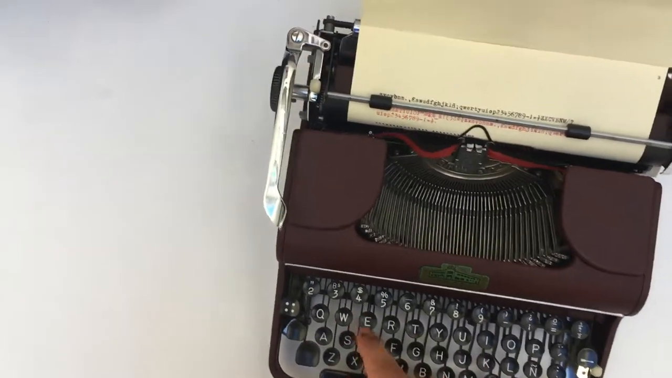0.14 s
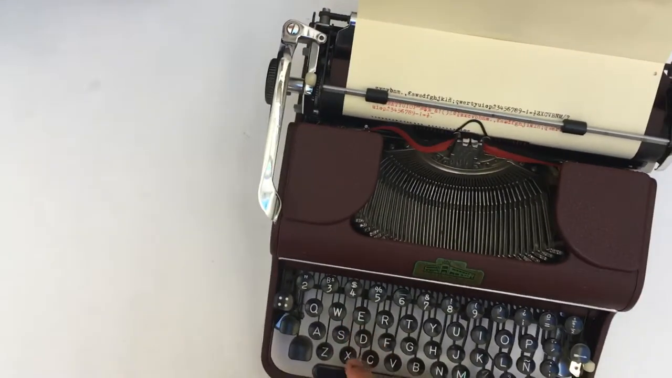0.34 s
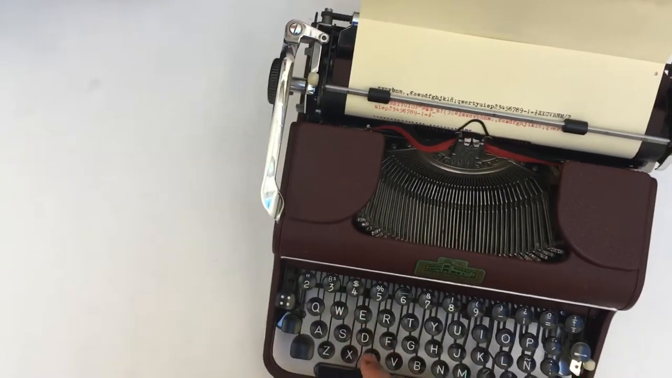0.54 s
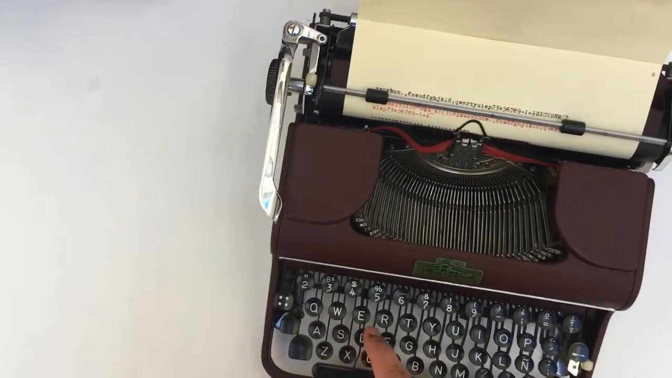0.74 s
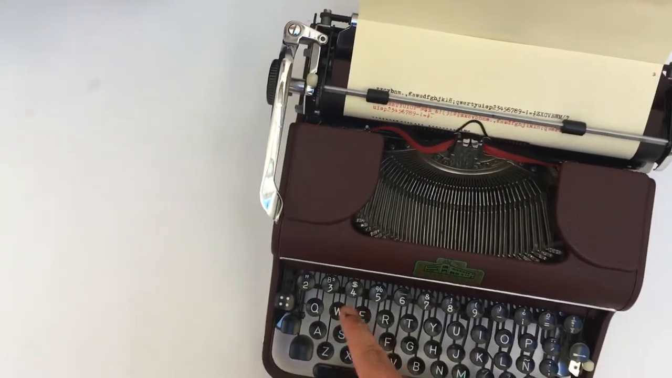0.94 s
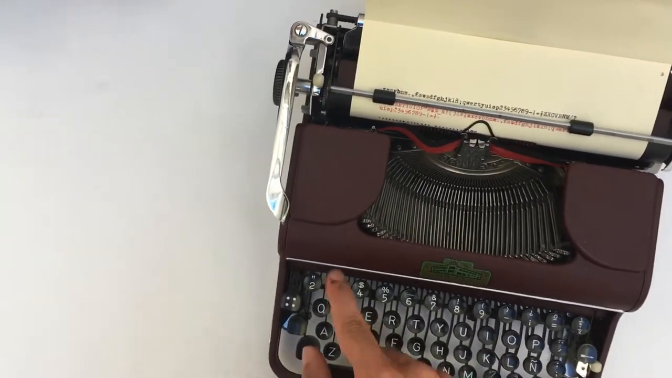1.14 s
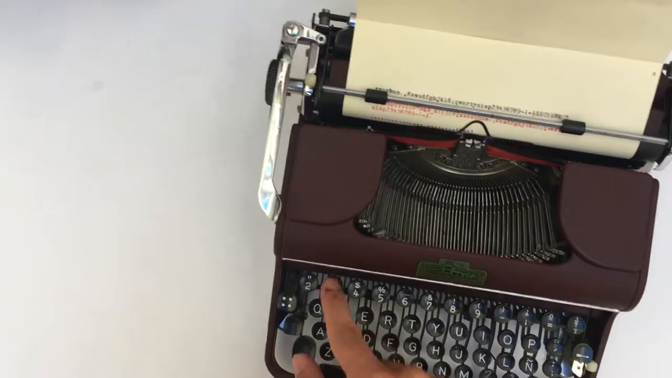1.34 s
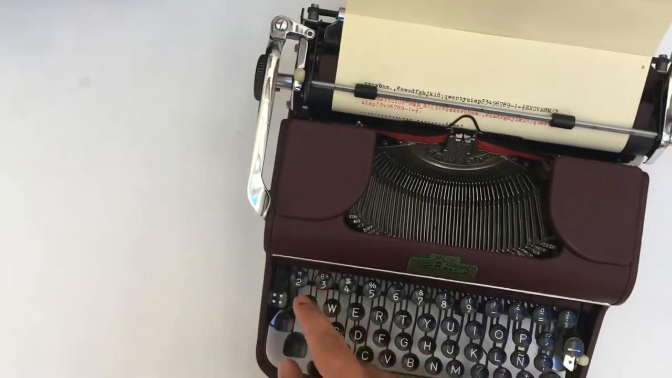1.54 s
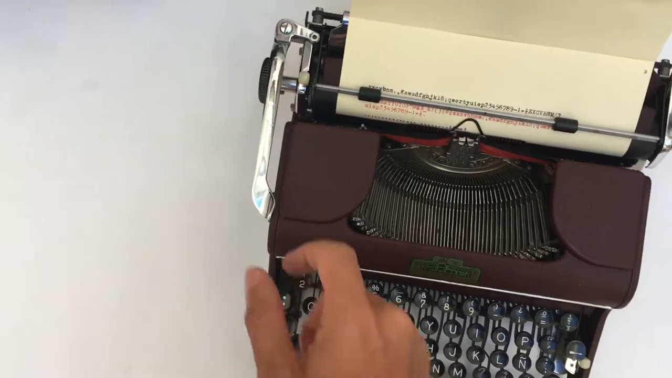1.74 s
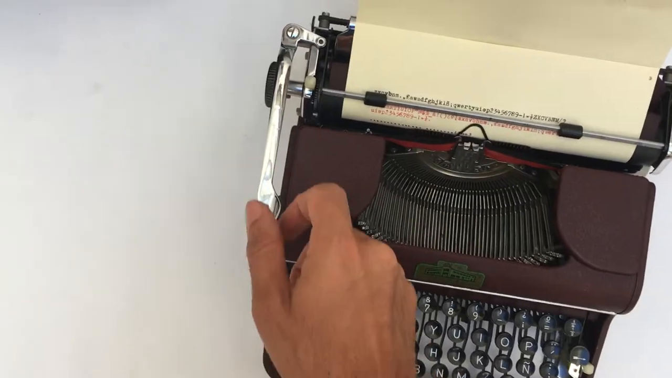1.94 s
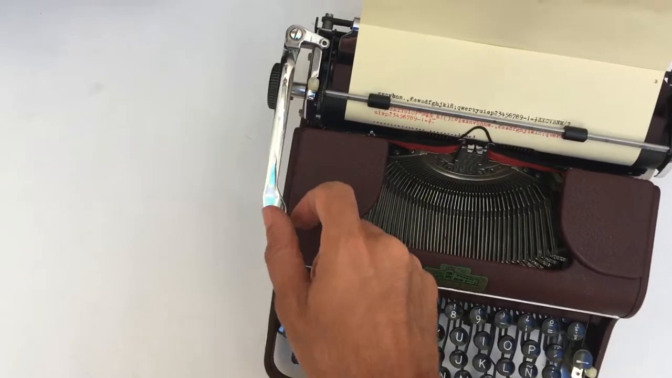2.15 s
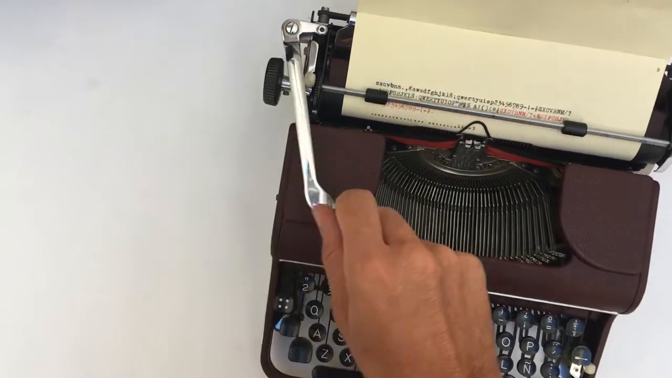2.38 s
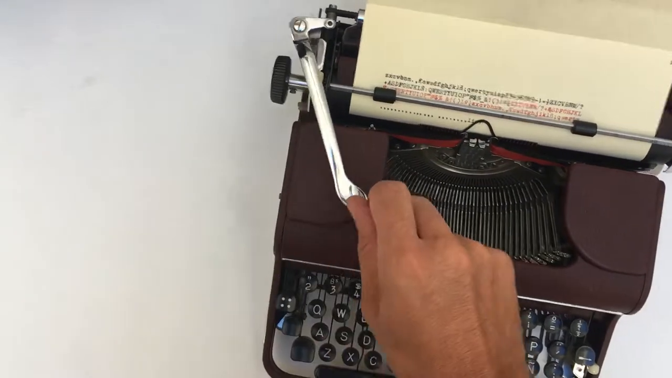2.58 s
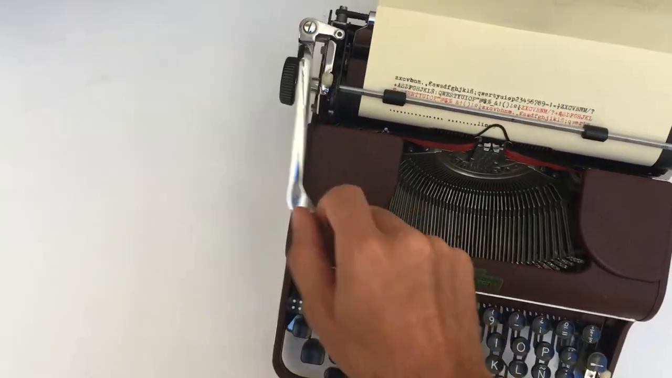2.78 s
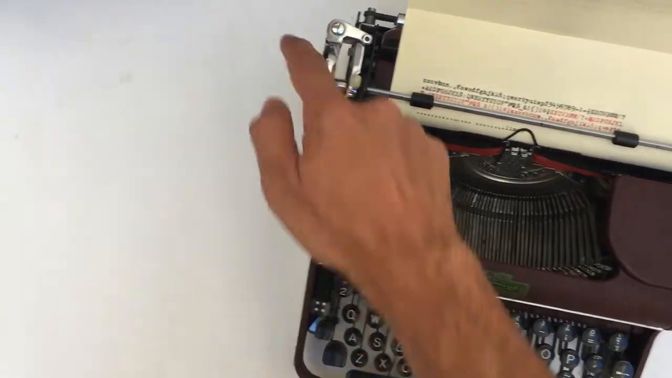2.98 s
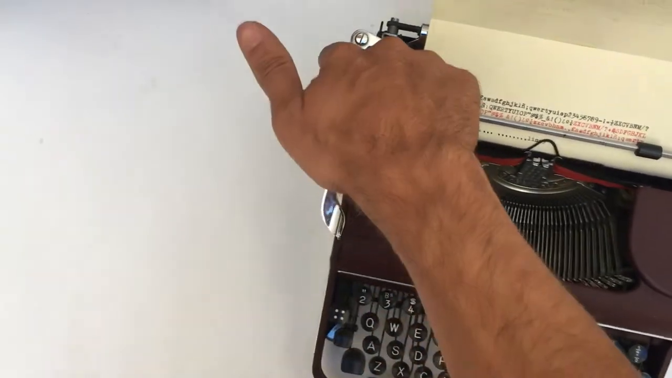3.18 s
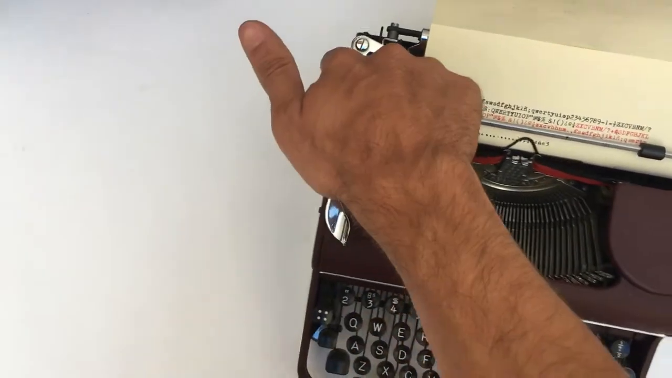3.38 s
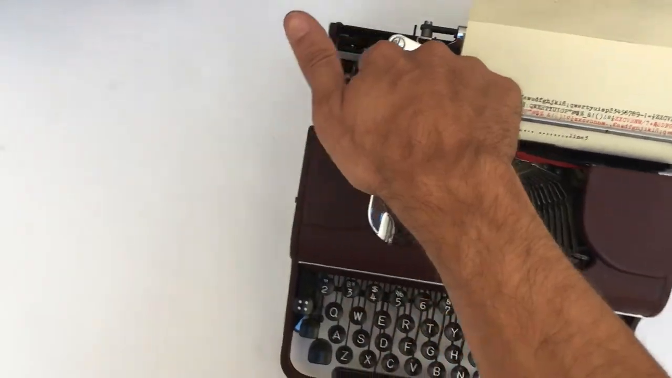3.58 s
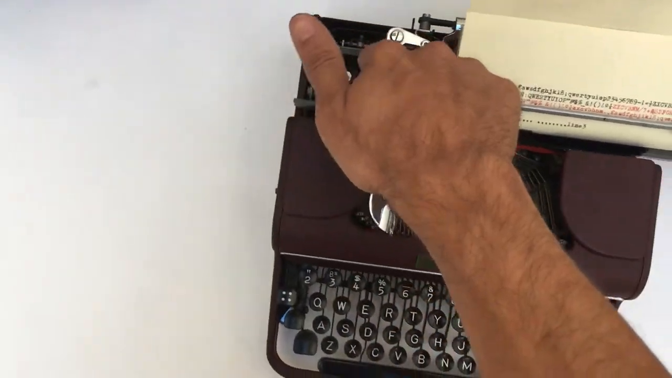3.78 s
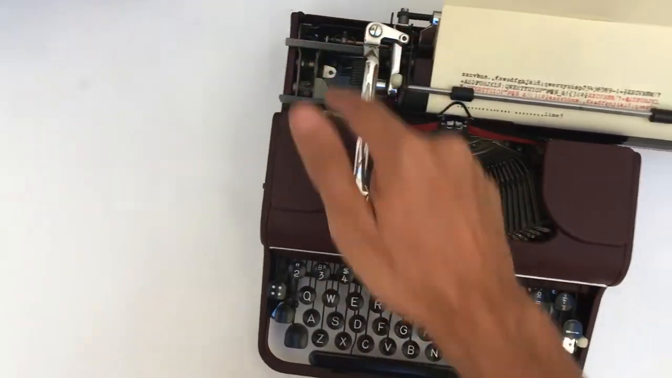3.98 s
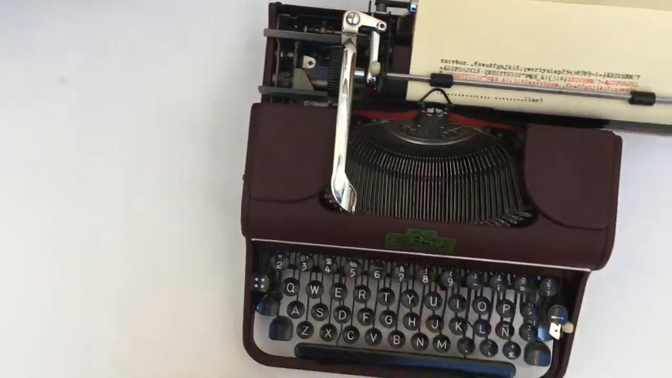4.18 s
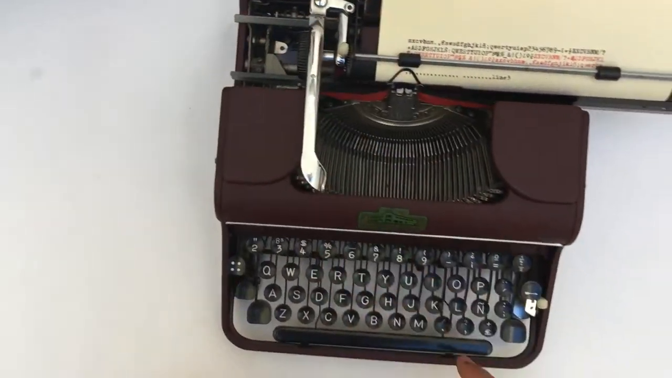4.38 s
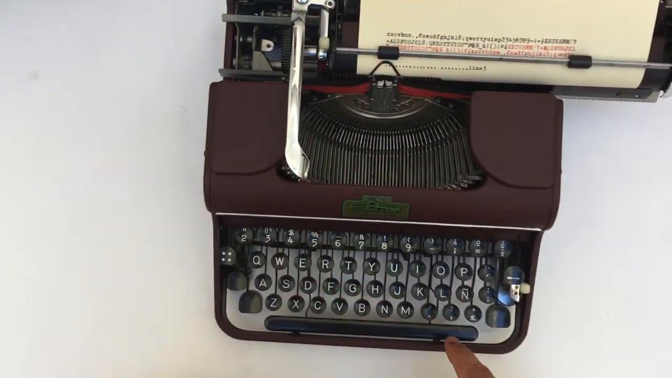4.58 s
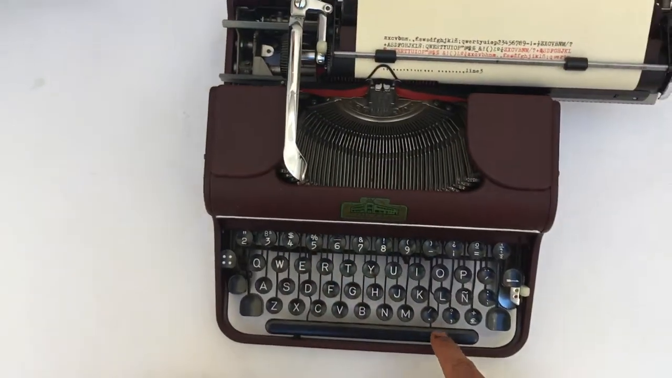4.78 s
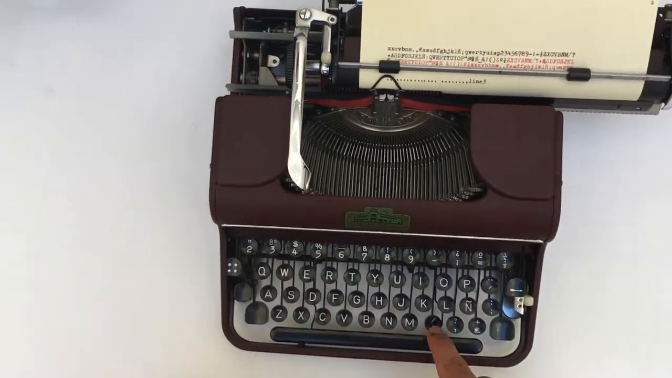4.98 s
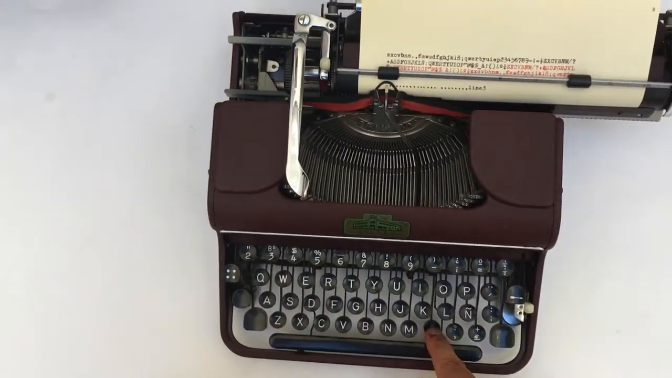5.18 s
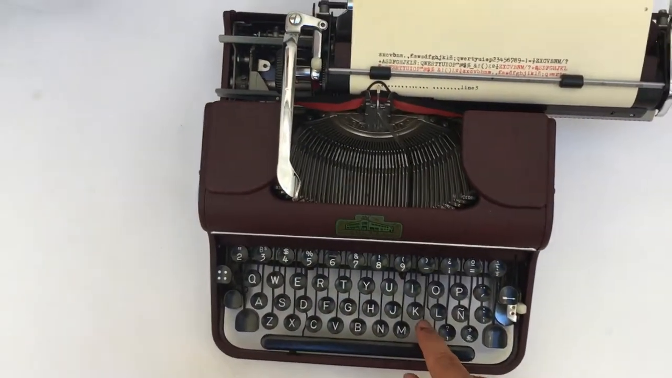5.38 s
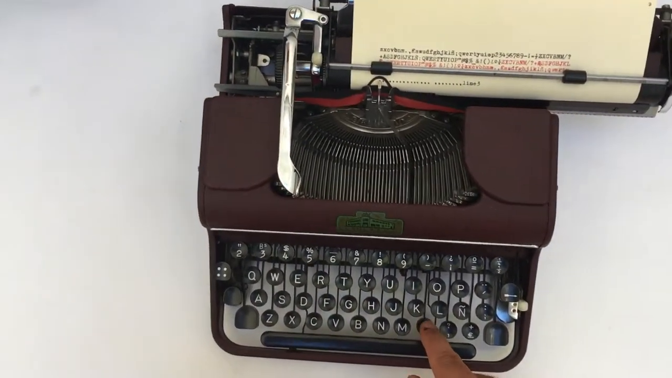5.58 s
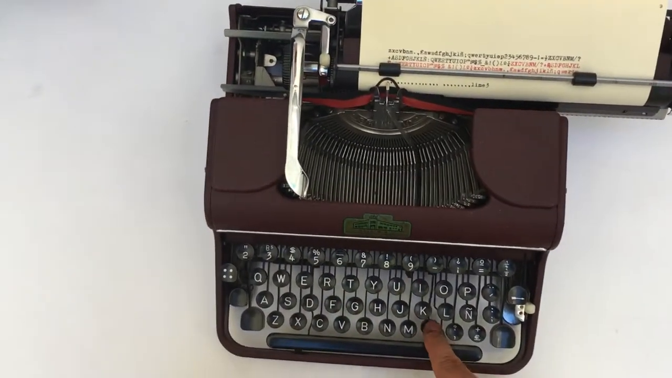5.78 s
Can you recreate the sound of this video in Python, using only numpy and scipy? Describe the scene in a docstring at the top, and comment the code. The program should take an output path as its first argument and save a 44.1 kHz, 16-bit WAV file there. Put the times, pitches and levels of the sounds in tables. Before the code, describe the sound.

Three sharp clacks from a small manual typewriter, with a lever ratcheting and the carriage sliding to a thudding stop in between, in a quiet room.

```python
"""Three letters clack on a small manual typewriter; between them a lever ratchets and the carriage slides to its stop.
The machine stands on a desk in a quiet room with a low rumble, with a phone close above it.
Each blow is a short rattle of random pushes that rings groups of steel parts, with damped sines for single notes.
Low damped sines thump the desk, a fading noise tail makes the room, and shaped noise makes the air."""
import sys
import numpy as np
from scipy import signal
from scipy.fft import rfft, irfft, next_fast_len
from scipy.io import wavfile
from scipy.ndimage import uniform_filter1d

SR = 44100
rng = np.random.default_rng(int(sys.argv[2]) if len(sys.argv) > 2 else 0)


def linear_from_db(decibels):
    """Turn decibels (scalar or array-like) into linear amplitude factors; 0 gives 1."""
    return 10 ** (np.asarray(decibels, float) / 20)


def digitize_waveform(pressure):
    """Quantize a signal to 16-bit integers and store it at the path in sys.argv[1].

    Rows of a 2-D input are taken as channels; values are limited to [-1, 1].
    """
    field = np.atleast_2d(pressure).T
    bounded = np.clip(field, -1, 1)
    quanta = np.round(bounded * 32767).astype(np.int16)
    wavfile.write(sys.argv[1], SR, quanta)


N = 257103  # length in samples

# A t60 is the time in which a sound fades by 60 dB. Levels of notes and blows hold before their soft start.

# A finger takes up the slack of a key. Each row: start in seconds, level in dB.
KEY_PRESSES = [(0.001, -37.5), (1.238, -42.5), (5.149, -54)]
# Type slugs hit the platen. Each row: start in seconds, level in dB, note of the type bar in Hz.
SLUG_HITS = [(0.0311, -7, 2610), (1.276, -6.5, 2608), (5.2001, -9, 3200)]
# Key and bar fall back to rest. Each row: start in seconds, level in dB, springs against bars in dB.
KEY_FALLS = [(0.125, -48, 14), (0.135, -52, 8), (0.157, -34.5, 3.5), (1.363, -55, 11), (1.382, -50.5, 21),
             (1.402, -38, -21), (1.41, -41, 7), (5.283, -44.5, 1), (5.358, -57, -34.5)]
# A landing bar sounds its rest rail. Each row: start in seconds, level in dB.
RAIL_NOTES = [(.151, -32), (1.4, -27)]
# The line pawl drops over the platen's teeth. Each row: start in seconds, level in dB.
PAWL_DROPS = [(2.7665, -15), (2.7901, -17.5), (2.8122, -18.5), (2.8385, -22)]
# The freed carriage skips over its rack. Each row: start in seconds, level in dB.
RACK_SKIPS = [(3.346, -58), (3.361, -53), (3.399, -47.5), (3.42, -45.5), (3.437, -45.5), (3.468, -40.5),
              (3.482, -39), (3.496, -42), (3.511, -47)]
# The release latch clicks. Each row: start in seconds, level in dB.
LATCH_CLICKS = [(3.2266, -46), (3.241, -49.5), (3.815, -51), (3.88, -41.5), (4.003, -62.5)]
# Bright clicks of links, lever and stop. Each row: start in seconds, level in dB,
# frame against bars in dB, springs against bars in dB, t60 in seconds.
LINK_CLICKS = [(0.0206, -24, -7.5, 10.5, 0.054), (1.256, -38.5, -4.5, 7, 0.062),
               (1.268, -24, -7, 15, 0.036), (2.329, -56, 4, -1, 0.037), (2.609, -57, -14, 9, 0.033),
               (2.7125, -37, -4.5, 9, 0.041), (2.731, -26, -1, 1.5, 0.087), (3.324, -55, 1, 10, 0.024),
               (3.674, -45, -16, 8.5, 0.027), (3.6944, -53, -9, 7, 0.022), (3.7229, -30, -1, 0.5, 0.061),
               (3.727, -30.5, -6, 8, 0.062), (3.904, -39.5, 5, -2, 0.099), (3.908, -33.5, -4, 8.5, 0.05),
               (4.225, -64, -17, -5, 0.093), (5.154, -43.5, 0, 9.5, 0.037), (5.175, -34, -3, 5, 0.052),
               (5.1875, -29, 1.5, 12, 0.072)]
# Dull taps on the frame. Each row: start in seconds, level in dB, frame against bars in dB.
FRAME_TAPS = [(2.312, -61, 11.5), (2.535, -53, 15), (2.625, -72, 22), (2.698, -61, 8), (2.887, -33, 2.5),
              (2.897, -60.5, 21), (3.181, -69.5, 20), (3.738, -35.5, 9), (3.86, -48, 4)]
# Single parts are knocked into a short note. Each row: start in seconds, level in dB, pitch in Hz, t60 in seconds.
PART_KNOCKS = [(.157, -33.5, 2560, 0.03), (1.376, -40, 950, 0.034), (1.406, -33, 2600, 0.025),
               (1.96, -53.5, 1000, 0.04), (2.266, -57.5, 2200, 0.031), (2.8, -31.5, 770, 0.021),
               (2.536, -23.5, 386, 0.014), (3.727, -20, 1610, 0.039), (3.742, -21.5, 807, 0.024),
               (5.203, -23.5, 12000, 0.059), (5.263, -30.5, 275, 0.048), (5.275, -33, 1770, 0.028),
               (5.357, -39.5, 1830, .022)]
# Lever and carriage rub, one list per slide. Each row: time in seconds, then frame, bars and springs in dB.
SLIDES = [
    [(2.352, -61, -60, -56), (2.385, -51, -50.5, -48), (2.466, -52, -47.5, -49.5),
     (2.54, -47.5, -45.5, -43)],
    [(3.335, -59, -67, -65), (3.45, -52, -53.5, -55), (3.52, -52, -54, -50), (3.571, -51.5, -49.5, -44.5),
     (3.65, -54, -55, -48.5), (3.725, -56, -59, -56)],
    [(4.31, -72.5, -64, -61), (4.37, -90, -77, -65.5)],
]

# Resonances of the frame. Each row: centre in Hz, width in Hz, level against the other rows in dB.
FRAME_PEAKS = [(236.8, 180, -11), (760, 210, -5.5), (1110, 1000, -13.5), (1655, 460, -7), (1890, 200, -7.5),
               (2220, 760, -6), (2630, 280, -9.5), (2960, 750, -15)]
# Resonances of the bars. Each row: centre in Hz, width in Hz, level against the other rows in dB.
BAR_PEAKS = [(4200, 1400, -0.5), (3160, 970, -0.5), (5830, 1600, 4.5), (6900, 1100, 2), (5410, 230, 4),
             (9116, 3200, 3)]
# Resonances of the springs. Each row: centre in Hz, width in Hz, level against the other rows in dB.
SPRING_PEAKS = [(10370, 1400, 1.8), (11456, 420, -1), (12400, 1700, -0.17), (14140, 1300, -0.77),
                (15400, 2300, -0.91)]
# Resonances of the sliding arm. Each row: centre in Hz, width in Hz, level against the other rows in dB.
ARM_PEAKS = [(2255, 480, -4.5), (900, 300, -10.5)]
# Parts that ring on. Each row: pitch in Hz, gain in dB, t60 in seconds.
LONG_RINGS = [(725, -70, .8)]
# Every slug sets the type basket ringing. Each row: pitch in Hz, level against the blow in dB, t60 in seconds.
# Pitch and level are middles; each blow strays from them by chance, here and in the next two tables.
BASKET_MODES = [(1876, -9.5, .038), (3950, -14.5, 0.046), (5530, -4.5, 0.038), (6030, -3, 0.022)]
# The line pawl rings its wheel. Each row: pitch in Hz, level against the blow in dB, t60 in seconds.
PAWL_MODES = [(760, -17, 0.03), (2109, -2, 0.034), (2246, -3, 0.021), (2393, -4, 0.033), (5480, -10, 0.031),
              (6480, -2, 0.018), (8694, 0.5, 0.0096)]
# Every rack tooth pings the same parts. Each row: pitch in Hz, level against the blow in dB, t60 in seconds.
RACK_MODES = [(2260, 0, 0.017), (2840, 7.5, 0.017), (4820, 6, 0.012), (7540, 5, 0.012), (8850, 10.5, 0.016),
              (9560, 10, 0.017), (10700, 8, 0.015)]

# The machine jolts the desk. Each row: start in seconds, high knock in dB, deep knock against it in dB.
DESK_THUMPS = [(0.03, -27.5, -0.5), (1.246, -29.5, -4), (1.283, -20, -19), (1.412, -37, 16),
               (2.538, -32.5, -15), (2.738, -28.5, 2), (2.789, -26.5, -2), (2.889, -29, -21),
               (3.294, -41.5, 10.5), (3.747, -17, -10), (3.767, -27, 5), (3.785, -30.5, 8),
               (3.866, -28.5, 1), (3.927, -38.5, 7), (5.264, -20.5, -3), (5.309, -26.5, 5.5)]
# The carriage rumbles on its rails and ends in a thud at the stop. Each row: time in seconds, level in dB.
CARRIAGE_ROLL_AND_THUD = [(3.33, -61), (3.5, -53.5), (3.714, -66), (3.74, -33.5)]
# How long the room rings. Each row: centre in Hz, t60 in seconds.
ROOM_FADES = [(500, 1), (1700, 0.42), (4200, 0.62), (9500, 0.21)]
# Colour of the room tone and rumble. Each row: frequency in Hz, relative level in dB per Hz.
AIR_COLOUR = [(15, -39), (25, -9), (41, -5.5), (64, 4.5), (84, -6), (111, -18.5), (236, -30.5),
              (531, -37.5), (1480, -44), (4870, -55), (14800, -49.5), (16000, -54.5)]
# Loudness of the low rumble. Each row: time in seconds, level in dB.
RUMBLE_LEVELS = [(0.0, -50.5), (3.86, -45.5), (4.55, -56), (5.83, -53)]
# Faint far tones and rustles. Each row: start in seconds, end in seconds, centre in Hz, width in Hz, peak level in dB.
FAR_TONES = [(0.37, 0.63, 1192, 30, -69.5), (4.085, 4.516, 1336, 150.7, -71.5),
             (4.189, 4.888, 409.4, 59.2, -70.5), (4.2, 4.545, 570, 593, -63), (5.659, 5.9, 1255, 84, -68),
             (5.65, 5.899, 794, 894, -67)]
# Dips in the microphone's treble. Each row: centre in Hz, width in Hz, depth from 0 to 1.
MIC_DIPS = [(10330, 910, 0.6)]

# kinds of contact: frame against bars in dB, springs against bars in dB, t60 in seconds
PRESS, SLUG, REBOUND = (1.2, 5.3, 0.26), (-15, -5.5, 0.041), (-6.5, 0.9, 0.1)
PAWL, RACK, LATCH = (-7, -2.2, 0.019), (-4, -2, 0.015), (3.3, -18.5, 0.027)
FALL_FRAME_DB, FALL_T60_S = 7, 0.052
TAP_SPRINGS_DB, TAP_T60_S = -3.5, 0.047
SLUG_RATTLE_DB = -2.5  # rattle against the slug's level
REBOUND_LAG_S, REBOUND_DB = 0.023, -22  # level against the slug's rattle
RISE_SHARE, TICK_DB = 0.012, 10  # rise time as a share of t60; first tick against the blow, less if slow
RATTLE_DB, RATTLE_T60_S = -24.5, 0.25  # after-rattle against the blow, lower still after short blows
ARM_DB = 0.5  # rubbing of the arm against the frame
SLUG_NOTE_DB, SLUG_NOTE_LAG_S, SLUG_NOTE_T60_S = -5, 0.001, 0.032  # level against the slug
FALL_NOTE_HZ, FALL_NOTE_T60_S = 1900, 0.083
STRAY = 0.005  # spread of pitch from blow to blow, as a share
HIGH_KNOCK_HZ, DEEP_KNOCK_HZ, THUMP_T60_S = 164.5, 123.6, 0.055
DESK_HZ, DESK_DB, DESK_T60_S = 167.8, -12.5, 0.85
ROOM_DB, NOTE_ROOM_DB = -18.5, -11  # room tail, and how much less the notes feed it
AIR_DB = -61.5  # middle level of the room tone
LOUD, HOLD_S = 0.14, 0.424  # size that opens the hiss, and for how long
HISS_DB, HISS_HZ = -60, 3000  # level before the high-pass, and its corner
TOP_HZ = 15750


def machine():
    """Rough contact drives the groups of parts; a few ring on. Returns the clatter and the single notes."""
    force, ticks = contact()
    # micro-impacts of nearly even size and random sign
    sign = np.sign(rng.standard_normal(force.shape))
    push = ticks + force * sign * linear_from_db(1.9 * rng.standard_normal(N))
    groups = (FRAME_PEAKS, BAR_PEAKS, SPRING_PEAKS, ARM_PEAKS)
    steel = sum(body(p, peaks) for p, peaks in zip(push, groups))
    ringing = sum(linear_from_db(db) * ring(steel, hz, t60) for hz, db, t60 in LONG_RINGS)
    return steel + ringing, notes(struck_notes())


def contact():
    """How hard steel touches steel, for frame, bars, springs and arm: blows, their after-rattle, and rubbing."""
    force, ticks, t = np.zeros((4, N)), np.zeros((4, N)), np.arange(N) / SR
    for s, db, frame_db, springs_db, t60 in blows():
        i, t60 = int(s * SR), max(t60, 0.008)
        age = t[:N - i][:SR // 4]
        size = linear_from_db(db + np.array([[frame_db], [0], [springs_db]]))
        # slow blows also start softly
        shape = (1 - np.exp(-age / (RISE_SHARE * t60))) * decay(age, t60)
        # loose parts go on chattering, more so after a drawn-out blow
        chatter = linear_from_db(RATTLE_DB) * min(1, t60 / 0.025) ** 2
        shape = shape + chatter * decay(age, RATTLE_T60_S)
        force[:3, i:i + len(age)] += size * shape
        # the shorter the blow, the harder its first contact
        ticks[:3, i + 8] += size[:, 0] * linear_from_db(TICK_DB) * min(1, (0.039 / t60) ** 2)
    # rubbing is uneven, partly shared by all the parts
    grain = linear_from_db(np.array([2.5 * walk(90) for _ in force]) + 1.5 * walk(160))
    for slide in SLIDES:
        s, *levels = np.transpose(slide)
        levels.append(levels[0] + ARM_DB)
        moving = uniform_filter1d(1.0 * ((t > s[0]) & (t < s[-1])), 400)
        force += moving * grain * linear_from_db(np.array([np.interp(t, s, db) for db in levels]))
    return force, ticks


def blows():
    """All contacts as rows of start, level, frame dB, springs dB and t60; every slug rebounds once."""
    slugs = [(s, db + SLUG_RATTLE_DB) for s, db, _ in SLUG_HITS]
    rebounds = [(s + REBOUND_LAG_S, db + REBOUND_DB) for s, db in slugs]
    kinds = [(KEY_PRESSES, PRESS), (slugs, SLUG), (rebounds, REBOUND),
             (PAWL_DROPS, PAWL), (RACK_SKIPS, RACK), (LATCH_CLICKS, LATCH)]
    rows = [row + kind for table, kind in kinds for row in table]
    rows += [(s, db, FALL_FRAME_DB, springs_db, FALL_T60_S) for s, db, springs_db in KEY_FALLS]
    rows += LINK_CLICKS
    return rows + [row + (TAP_SPRINGS_DB, TAP_T60_S) for row in FRAME_TAPS]


def struck_notes():
    """Short notes of slugs, falling bars, pawl, rack and single parts: rows of start, level, pitch and t60."""
    rows = [(s + SLUG_NOTE_LAG_S, db + SLUG_NOTE_DB, hz, SLUG_NOTE_T60_S) for s, db, hz in SLUG_HITS]
    rows += [(s, db, FALL_NOTE_HZ, FALL_NOTE_T60_S) for s, db in RAIL_NOTES]
    for table, modes in ((SLUG_HITS, BASKET_MODES), (PAWL_DROPS, PAWL_MODES), (RACK_SKIPS, RACK_MODES)):
        for row in table:
            # no two blows land on quite the same spot
            spot = rng.standard_normal((len(modes), 2))
            for (hz, db, t60), (louder, higher) in zip(modes, spot):
                rows.append((row[0], row[1] + db + 2.0 * louder, hz * (1 + STRAY * higher), t60))
    return rows + PART_KNOCKS


def desk():
    """Soft low knocks and the carriage's roll and closing thud pass through the feet; the desk top hums after."""
    roll = band(rng.standard_normal(N), 220, 170, order=2)
    roll_db = np.interp(np.arange(N) / SR, *np.transpose(CARRIAGE_ROLL_AND_THUD), left=-120, right=-120)
    roll_and_thud = roll / roll.std() * linear_from_db(roll_db)
    high = notes([(s, db, HIGH_KNOCK_HZ, THUMP_T60_S) for s, db, _ in DESK_THUMPS], swell=0.81)
    deep = notes([(s, db + deep_db, DEEP_KNOCK_HZ, THUMP_T60_S) for s, db, deep_db in DESK_THUMPS])
    out = roll_and_thud + high + deep
    return out + linear_from_db(DESK_DB) * ring(out, DESK_HZ, DESK_T60_S) * DESK_HZ / SR


def room(x):
    """Scattered echoes: a noise tail that swells in softly and fades at a different speed in each band."""
    t, tail = np.arange(SR) / SR, 0
    for hz, t60 in ROOM_FADES:
        tail = tail + band(rng.standard_normal(SR), hz, 0.95 * hz) * decay(t, t60)
    tail = tail * (1 - np.exp(-(t / 0.018) ** 2))
    return linear_from_db(ROOM_DB) * signal.fftconvolve(x, tail / np.sqrt(np.sum(tail ** 2)))[:N]


def air():
    """Wavering room tone, a rumble beneath it that rises and falls, and faint far tones, all from noise."""
    t, points = np.arange(N) / SR, next_fast_len(N)
    hz = np.maximum(np.arange(points // 2 + 1) * SR / points, 1)
    colour_hz, colour_db = np.transpose(AIR_COLOUR)
    gain = linear_from_db(np.interp(np.log(hz), np.log(colour_hz), colour_db))
    tone = coloured(gain * (hz > 100), points)[:N]
    # the rumble lies below 100 Hz and thins out below 42 Hz
    rumble = coloured(gain * (hz <= 100) / (1 + (42 / hz) ** 4), points)[:N]
    out = linear_from_db(AIR_DB + 1.5 * walk(22)) * tone / tone.std()
    out = out + linear_from_db(np.interp(t, *np.transpose(RUMBLE_LEVELS))) * rumble / rumble.std()
    for start, end, pitch_hz, width, db in FAR_TONES:
        swell = np.sin(np.pi * np.clip((t - start) / (end - start), 0, 1))
        whine = band(rng.standard_normal(N), pitch_hz, width, order=2)
        out = out + linear_from_db(db) * swell * whine / whine.std()
    return out


def decay(age, t60):
    """Steady fading of a ringing thing: by 60 dB in t60 seconds."""
    return np.exp(-np.log(1000) * age / t60)


def notes(rows, swell=0.69):
    """Damped sines that swell in at a pace set in cycles of the note."""
    out, t = np.zeros(N), np.arange(SR // 4) / SR
    for s, db, hz, t60 in rows:
        rise = 1 - np.exp(-hz * t / swell)
        note = linear_from_db(db) * np.sin(2 * np.pi * hz * t) * rise * decay(t, t60)
        i = int(s * SR)
        out[i:i + len(t)] += note[:N - i]
    return out


def ring(x, hz, t60):
    """One ringing mode; a unit impulse starts it at size 1."""
    pole = np.exp(2j * np.pi * hz / SR - np.log(1000) / (t60 * SR))
    return signal.lfilter([1], [1, -pole], x).imag


def body(x, peaks):
    """Resonances add in power; the filter never sounds ahead of a blow and keeps the level of white noise."""
    size = 4096
    hz = np.arange(size // 2 + 1) * SR / size
    power = sum(linear_from_db(db) ** 2 / (1 + (2 * (hz - f) / w) ** 2) ** 2 for f, w, db in peaks)
    # folding the cepstrum puts all of the response after time zero
    cepstrum = irfft(0.5 * np.log(power))
    cepstrum[1:size // 2] *= 2
    cepstrum[size // 2 + 1:] = 0
    response = irfft(np.exp(rfft(cepstrum)))
    return signal.fftconvolve(x, response / np.sqrt(np.sum(response ** 2)))[:N]


def band(x, hz, width, order=1):
    """Keeps the sound around hz."""
    edges = [max(hz - width / 2, 10), min(hz + width / 2, 0.48 * SR)]
    return signal.sosfilt(signal.butter(order, edges, "bandpass", fs=SR, output="sos"), x)


def coloured(shape, points):
    """Noise with the given gain at each of its frequencies."""
    return irfft(rfft(rng.standard_normal(points)) * shape, points)


def walk(rate):
    """Slow random wavering with spread 1, up to about rate in Hz."""
    x = signal.sosfilt(signal.butter(2, rate, fs=SR, output="sos"), rng.standard_normal(N))
    return x / x.std()


def scene():
    """The machine, dry and in the room, over the desk and the air; single notes stay close."""
    steel, pings = machine()
    echoes = room(steel + linear_from_db(NOTE_ROOM_DB) * pings)
    return (steel + pings + echoes + desk() + air())[None]


def roll_off(x):
    """The treble ends steeply here."""
    return signal.sosfilt(signal.butter(12, 16820, fs=SR, output="sos"), x)


def record(dry):
    """A loud moment lets the phone's hiss through for a fixed hold; the top is cut, then peaks are rounded."""
    hold = int(HOLD_S * SR)
    is_loud = uniform_filter1d(dry[0] ** 2, size=SR // 500) > LOUD ** 2
    # the hiss is open if a loud moment began within the hold
    count = np.cumsum(np.diff(1 * is_loud, prepend=0) > 0)
    opened = uniform_filter1d(1.0 * (count > np.r_[np.zeros(hold), count[:-hold]]), size=600)
    high_pass = signal.butter(1, HISS_HZ, "highpass", fs=SR, output="sos")
    hiss = signal.sosfilt(high_pass, rng.standard_normal(N))
    x = dry + linear_from_db(HISS_DB) * opened * hiss
    x = x - sum(depth * band(x, hz, width) for hz, width, depth in MIC_DIPS)
    x = signal.sosfilt(signal.ellip(10, 0.3, 70, TOP_HZ, fs=SR, output="sos"), x)
    mix = 1.191 * np.tanh(x / 1.262)
    return roll_off(mix)


dry = scene()
out = record(dry)
digitize_waveform(out)
```